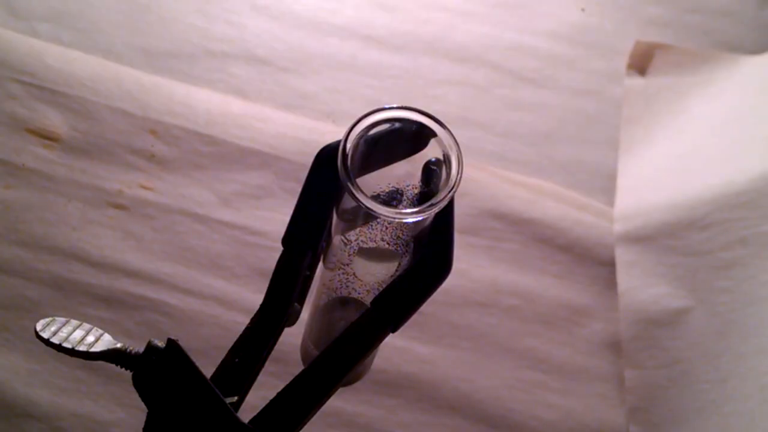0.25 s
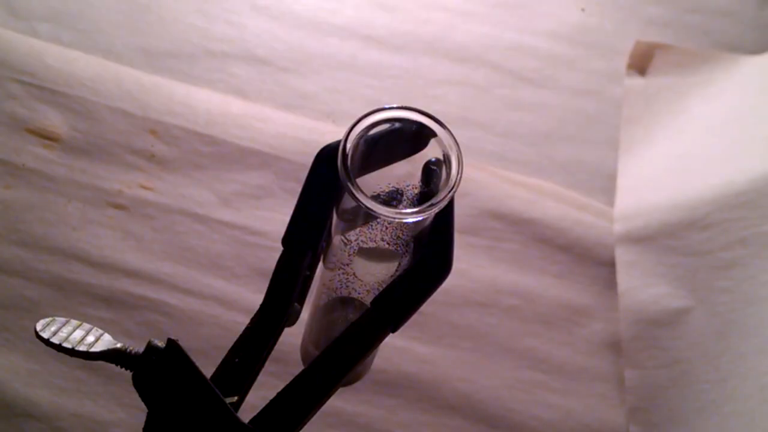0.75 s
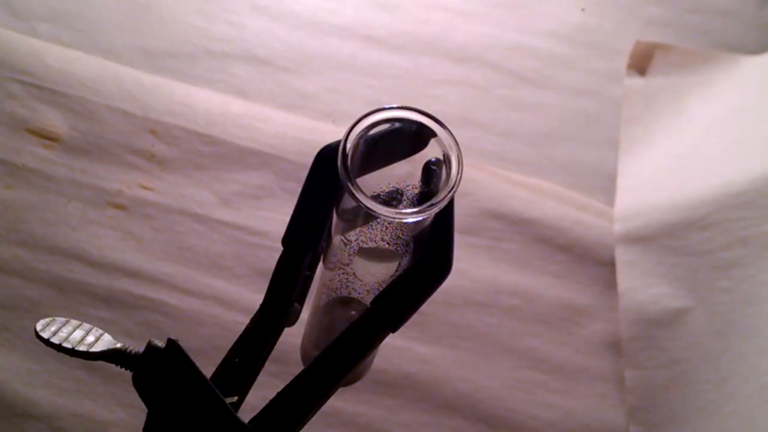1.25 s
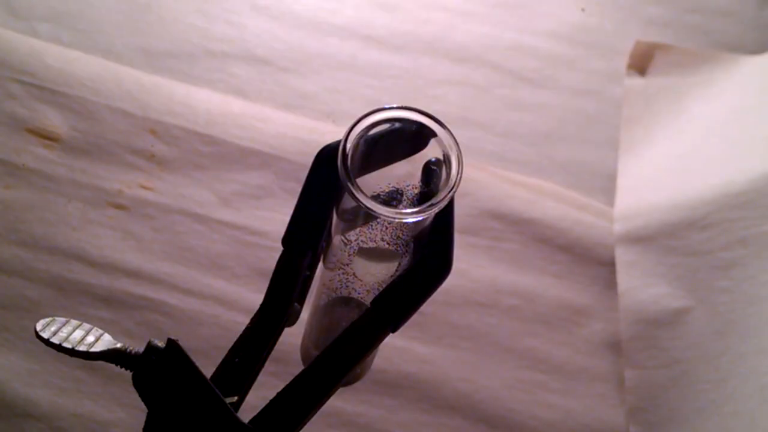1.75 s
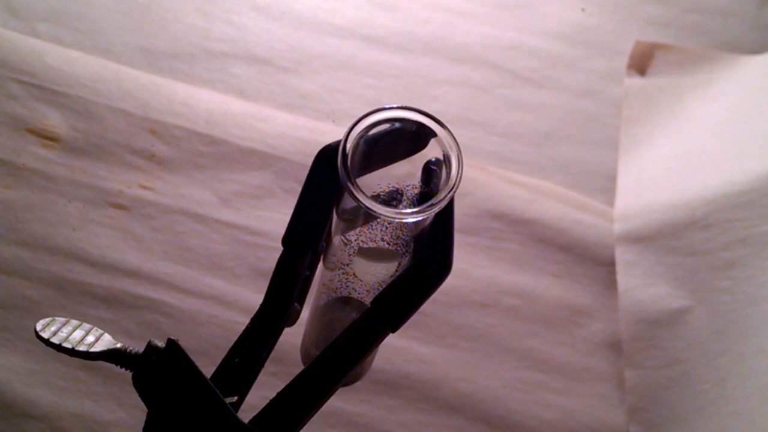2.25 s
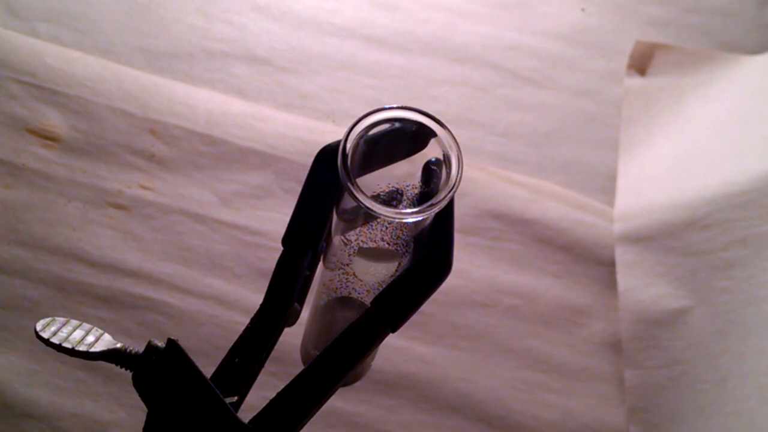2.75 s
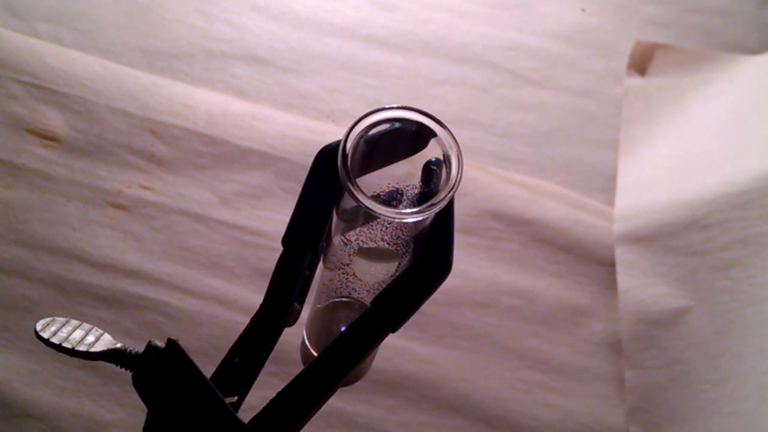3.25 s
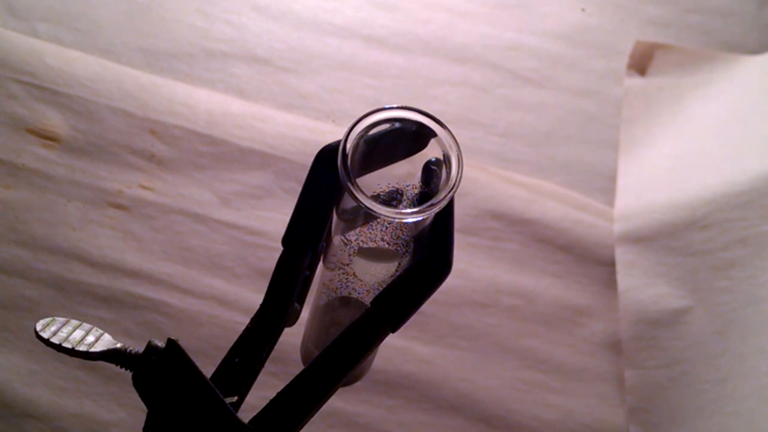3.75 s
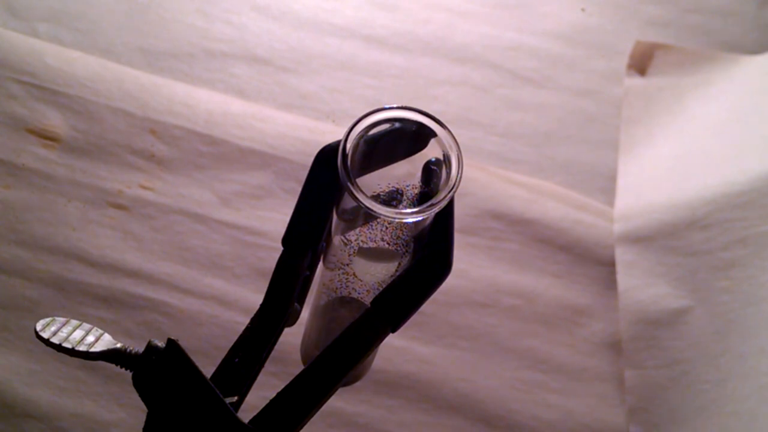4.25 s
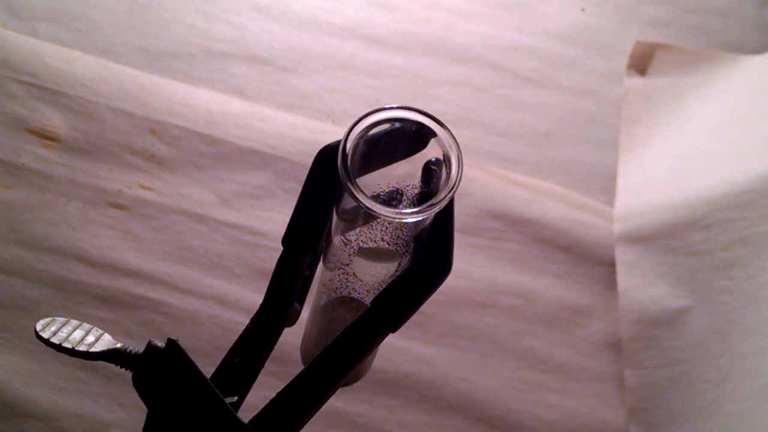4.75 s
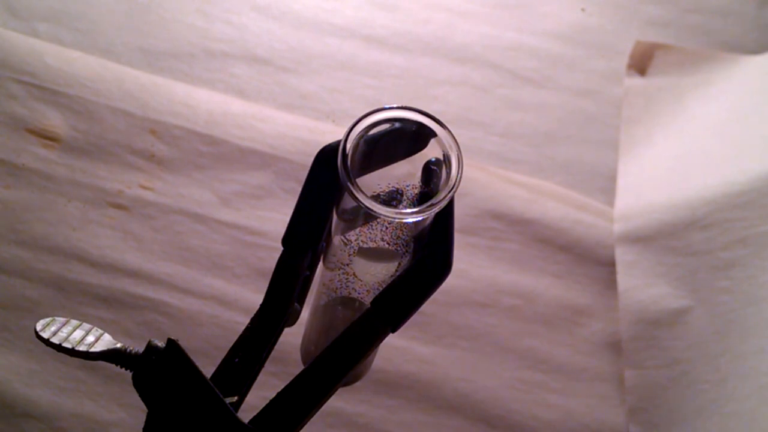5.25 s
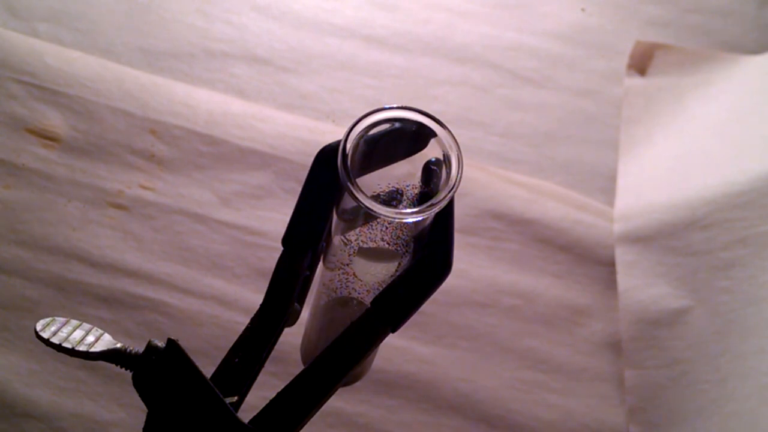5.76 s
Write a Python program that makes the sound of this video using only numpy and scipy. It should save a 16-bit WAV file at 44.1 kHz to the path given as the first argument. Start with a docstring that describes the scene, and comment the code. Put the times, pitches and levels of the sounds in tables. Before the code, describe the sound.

A chemical reaction ticks and pops inside a glass tube, glassy and hollow, growing louder and denser over a faint room hiss.

```python
"""In a small room, a reaction crackles close by in a clamped glass test tube.
Each flash in the liquid is a tiny blast that rings the air column (near odd multiples of about 650 Hz).
Sparks snap sharply between the pops, and gas bubbles sing short damped notes.
Fizz (noise grains), simmering (soft tube rings) and small flashes swell with the vigour of the reaction.
Low rumble, hiss and a fading mains hum lie underneath."""
import sys
import numpy as np
from scipy import signal
from scipy.fft import rfft, irfft
from scipy.io import wavfile
from scipy.ndimage import uniform_filter1d

SR = 44100
rng = np.random.default_rng(int(sys.argv[2]) if len(sys.argv) > 2 else 0)


def to_wav(sig):
    """Store sig (one row per channel, or 1-D mono) as 16-bit WAV at the path in sys.argv[1].

    Samples outside -1..1 are clipped; the rate is SR.
    """
    pcm = np.clip(np.atleast_2d(sig), -1, 1) * 32767
    pcm = np.round(pcm).astype(np.int16)
    wavfile.write(sys.argv[1], SR, pcm.T)  # frames by channels


N = 264600  # length in samples

# the bigger flashes that ring the tube: (t/s, push of gas/dB, sharpness/dB per register, crack/dB)
POPS = [(0.0602, -33, 4.5, -43), (0.0696, -26, -1.5, -50.0), (0.0856, -29, 4, -46), (0.1835, -38, 1.5, -45),
        (0.5416, -37.5, 5.5, -41), (0.5683, -36, -3, -41.5), (0.6104, -35, 1.5, -43),
        (0.6662, -33.0, -2, -39.5), (0.7436, -35.5, -2, -48), (0.9773, -34.5, 1.5, -39),
        (0.9874, -34.5, -2, -44.5), (0.996, -32, -3.5, -44.0), (1.105, -42.5, 1, -41),
        (1.2445, -34, -0.5, -53), (1.3253, -22, -0.5, -34), (1.4648, -36, 0, -49),
        (1.4924, -31.0, 1.5, -44.5), (1.854, -37.5, -5, -42.5), (2.204, -45.5, 1, -45.5),
        (2.3095, -42.5, 0.5, -46.0), (2.4414, -35, -0.5, -39.5), (2.612, -39.5, -0.5, -40),
        (2.769, -40.5, -1, -37), (2.8908, -33.5, -2, -46.0), (2.9655, -41, 3, -36),
        (3.1092, -38.5, -3, -43), (3.2173, -37, -1, -37), (3.29, -38.5, 1.5, -38.0),
        (3.3966, -22.5, -1.5, -47), (3.4156, -26, 2, -32.5), (3.533, -34, 10, -28.5),
        (3.6044, -27.5, 1, -61), (3.6163, -31.5, 0.5, -31.0), (3.7036, -38.5, 0, -31.5),
        (3.7742, -31.5, -2.5, -51), (3.8319, -31.5, 4.5, -36), (3.8646, -33.0, -8, -40),
        (3.9212, -17, 3, -17.5), (4.009, -22, 7.5, -23.5), (4.0972, -38.5, 0.5, -35.5),
        (4.1869, -36.5, -0.5, -42), (4.2728, -33.5, -2.5, -39.5), (4.307, -30, -3.5, -35.5),
        (4.3241, -27.5, -2.5, -44.5), (4.3355, -24.5, -4, -48.5), (4.375, -34, -1, -47),
        (4.4446, -37, 2.5, -39.5), (4.5963, -31, 0.5, -39), (4.6436, -33, 3, -54),
        (4.711, -15.5, 0.5, -29.5), (4.832, -32.0, 1.0, -37.5), (4.9504, -23.5, 6.5, -23),
        (4.9612, -22.5, 0.5, -24), (5.0298, -23.5, -3, -38.0), (5.0882, -34, -1, -38),
        (5.1509, -28.5, 2, -45), (5.1883, -31.5, -1.5, -47), (5.247, -37, 6.5, -43),
        (5.2942, -33.5, -2.5, -41), (5.351, -33.5, -3.5, -40), (5.4645, -33, 0, -38),
        (5.485, -26.5, -4, -39.5), (5.4944, -24.5, -2.5, -36), (5.5179, -27, -1.5, -41),
        (5.538, -31, -3.0, -48.0), (5.6985, -35.5, 4, -30.0), (5.8164, -31, 12, -20.5),
        (5.9188, -34.5, 5.0, -22), (5.9778, -30.5, 1.0, -34.5)]
# resonances of the tube and its foam: (f/Hz, time to fall by 60 dB/s, relative level/dB)
TUBE = [(540.4, 0.051, -16.5), (655.7, 0.058, 4), (1230, 0.041, -12), (1620, 0.048, -3.5), (1835, 0.024, 1),
        (1948.7, 0.057, 2.5), (3337, 0.024, 9.5), (3460, 0.011, -21), (4660, 0.03, -2.5),
        (6067, 0.017, 6.5), (7047, 0.025, 1), (8600, 0.028, -2.5), (12900, 0.0099, -25),
        (14300, 0.0061, -9)]
# how hard the reaction runs; drives the fizz, the simmering and the small flashes: (t/s, level/dB)
VIGOUR = [(0, -0.5), (1.75, 1.5), (2.3, -2), (2.8, 3), (3.8, 3.5), (4.8, 2.5), (5.4, 12), (6, 10.5)]
EDGE_HZ = 15750  # upper limit of the whole sound, and of the small sparks' centres


def gain_of(db):
    """Turns decibels into an amplitude factor."""
    return 10 ** (np.asarray(db) / 20)


def evened(x):
    """Scales a sound to an rms (average strength) of 1."""
    return x / np.sqrt(np.mean(x ** 2) + 1e-20)


def peaked(x, size):
    """Scales each row so that its loudest stretch of `size` samples has rms 1."""
    power = uniform_filter1d(x ** 2, size, axis=-1)
    return x / np.sqrt(power.max(-1, keepdims=True) + 1e-20)


def read_spectrum(points, hz):
    """Reads values between the points of a spectrum, along a log-frequency axis."""
    f, value = np.transpose(points)
    return np.interp(np.log(hz + 1), np.log(f), value)


def gain_over_time(curve):
    """Gives the gain at every sample from rows (t/s, level/dB)."""
    return gain_of(np.interp(np.arange(N) / SR, *np.transpose(curve)))


def coloured(x, points):
    """Makes each frequency louder or softer, following rows (f/Hz, gain/dB)."""
    hz = np.fft.rfftfreq(N, 1 / SR)
    return irfft(rfft(x) * gain_of(read_spectrum(points, hz)), N)


def band(x, low_hz, high_hz, order=2):
    """Keeps the frequencies between two limits (a causal band-pass filter)."""
    limits = [low_hz, min(high_hz, .45 * SR)]
    return signal.sosfilt(signal.butter(order, limits, "band", fs=SR, output="sos"), x)


def add(mix, s, sound):
    """Mixes a sound in from time s (seconds), cut off where the mix ends."""
    start = max(round(s * SR), 0)
    part = mix[:, start:][:, :sound.shape[-1]]
    part += sound[..., :part.shape[1]]


def sides(lean_db):
    """Gives left and right gains; a positive lean is to the right, a negative one to the left."""
    return gain_of(np.array([-lean_db, lean_db]) / 2)[:, None]


def background(air_db=-58.5, wide_db=7.0, hum_hz=124.83, hum_db=-62.5, hum_fade_db_per_s=2, hum_turn=2):
    """Low room rumble and hiss from shaped noise, plus a mains appliance whose faint hum fades."""
    # colour of the rumble and hiss: (f/Hz, relative level/dB)
    air_colour = [(15, -12), (38, -1), (55, -10.5), (120, -13.5), (250, -14), (500, -14.5), (1000, -21),
                  (2600, -29), (6000, -26), (15000, -25.5)]
    mid, side = (evened(coloured(noise, air_colour)) for noise in rng.standard_normal((2, N)))
    # the lows differ more between left and right than they agree
    side = coloured(side, [(130, wide_db), (300, 0.41)])
    air = gain_of(air_db) * np.array([mid + side, mid - side])
    t = np.arange(N) / SR
    phase = 2 * np.pi * hum_hz * t
    hum = evened(np.sin([phase, phase + hum_turn]))  # the right side is turned by 2 radians
    return air + gain_of(hum_db - hum_fade_db_per_s * t) * hum


def room(x, beam_hz=1100):
    """Low notes spread from the mouth of the tube and echo nearby; all bands feed a short tail."""
    # echoes off the bench and backdrop: (left delay/s, left gain, right delay/s, right gain)
    echoes = [(.00454, 0.33, .00644, 0.69), (.01156, 0.187, 0.01, 0.75), (.02041, 0.19, 0.025, 0.81),
              (.02649, 0.33, .02645, 0.35), (.03556, 0.53, 0.046, 0.42)]
    # how fast the tail dies away: (f/Hz, time to fall by 60 dB/s)
    tail_t60 = [(300, 0.3717), (700, 0.4), (2000, 0.14), (4000, 0.42), (8000, 0.2649), (15000, 0.2)]
    # how strong the tail is: (f/Hz, level/dB)
    tail_db = [(200, -19.5), (650, -3.5), (2000, -4), (3500, -9), (4800, -8.5), (7000, -7), (15000, -8.5)]
    low_pass = signal.butter(2, beam_hz, fs=SR, output="sos")
    low, out = signal.sosfiltfilt(low_pass, x.mean(0)), x.copy()
    for left_s, left, right_s, right in echoes:
        add(out[:1], left_s, left * low)
        add(out[1:], right_s, right * low)
    # the tail is noise that fades at its own pace in each band, after a silent start of 4 ms
    taps = rng.standard_normal((2, SR // 2))
    taps[:, :round(.004 * SR)] = 0
    hz, t, z = signal.stft(taps, SR, nperseg=256)
    t60 = read_spectrum(tail_t60, hz)[:, None]
    fall = gain_of(read_spectrum(tail_db, hz)[:, None] - 60 * t / t60)
    # long and short decays are set to equal energy before their levels apply
    shape = fall * np.sqrt(2 * np.log(1000) / (t60 * SR))
    tail = signal.istft(z * shape, SR, nperseg=256)[1]
    return out + signal.fftconvolve(x, tail, axes=1)[:, :N]


def tube_ring(t, tilt=0.2):
    """The tube's answer to one soft puff: fading sines; a larger tilt softens the high ones more."""
    return sum(gain_of(db - 60 * t / t60) * hz ** -tilt * np.sin(2 * np.pi * hz * t)
               for hz, t60, db in TUBE)


def clicks(per_s, spread_db, most=4, count=2000):
    """Single-sample impulses at random moments, many small and a few large, of either sign."""
    place, chance, sign = rng.random((count, 3))[:round(per_s * N / SR)].T
    size = gain_of(spread_db * np.minimum(-np.log(1 - chance), most))
    return np.bincount((place * N).astype(int), np.sign(sign - .5) * size, N)


def simmer(per_s=60, spread_db=3.5, tilt=1.5, calm_db=-64, follow=1.46):
    """Small bubbles burst all the time and ring the tube softly."""
    ring = tube_ring(np.arange(3000) / SR, tilt)
    rings = signal.oaconvolve(clicks(per_s, spread_db), ring)[:N]
    murmur = band(rings, 447.0, 8200)
    # each dB of vigour adds `follow` dB
    return gain_of(calm_db) * gain_over_time(VIGOUR) ** follow * evened(murmur)


def flare(flare_db=-21, lead=0.01, fade=0.012, follow=0.57):
    """The fizz flares up just before each bigger pop and dies away after it, more so for a hard crack."""
    t, out = np.arange(4000) / SR, np.zeros((1, N))
    swell = np.minimum(t / lead, 1) * np.exp(-t / fade)  # lead and fade in seconds
    for s, *_, crack_db in POPS:
        add(out, s - lead, gain_of(flare_db + follow * crack_db) * swell)
    return out[0]


def fizz(per_s=34, spread_db=4.0, t60=0.022, wander_db=4, clump_db=4.5, clump_hz=35, count=28, calm_db=-53.5):
    """Countless tiny sparks in irregular clumps, each kind a short grain with its own colour and side."""
    # colour of the fizz: (f/Hz, gain/dB)
    fizz_colour = [(900, -10), (1900, 4), (2600, -34.5), (3400, 8.5), (5000, -23), (6100, -2.5), (7400, -4),
                   (10200, -2.5), (11900, 3), (12800, -2), (14200, 5), (16000, 3.5)]
    t, out = np.arange(500) / SR, np.zeros((2, N))
    for _ in range(count):
        grain = rng.standard_normal(len(t)) * gain_of(-60 * t / t60)
        hz = rng.uniform(4350, 15820)
        grain = .5 * evened(grain) + evened(band(grain, hz / 1.336, hz * 1.13))
        sparks = signal.oaconvolve(clicks(per_s, spread_db), grain)[:N]
        out += sparks * sides(wander_db * rng.standard_normal())
    # slow noise makes the sparks bunch together
    clumps = gain_of(clump_db * evened(band(rng.standard_normal(N), 2.1, clump_hz)))
    strength = np.hypot(gain_of(calm_db) * gain_over_time(VIGOUR), flare())
    return strength * evened(clumps * coloured(out, fizz_colour))


def bubbles(t60=0.046, rise_cycles=0.78):
    """Gas bubbles sing short damped notes that swell over about their first cycle."""
    # one note per bubble: (t/s, f/Hz, level/dB)
    bubble_notes = [(0.001, 1545, -38.5), (0.986, 1635, -29.5), (0.997, 1930, -33.5), (1.3257, 1275, -29),
                    (3.6063, 1470, -31), (4.712, 1930, -14.5), (4.714, 1490, -26.5), (4.952, 1580, -23),
                    (4.962, 1906, -25.5), (4.966, 534, -26.5), (5.0301, 1963, -18.5), (5.221, 3400, -36.5),
                    (5.496, 1424, -34)]
    t, out = np.arange(3000) / SR, np.zeros((2, N))
    for s, hz, db in bubble_notes:
        swell = 1 - np.exp(-(hz * t / rise_cycles) ** 2)
        note = np.sin(2 * np.pi * hz * t) * gain_of(-60 * t / t60) * swell
        add(out, s, gain_of(db) * peaked(note, size=80))
    return out


def by_chance(per_s, most=200):
    """Random moments, each with the vigour of the reaction then (dB) and three random traits."""
    draws = rng.standard_normal((most, 5))
    # the mean of two squared normal draws gives the waiting times of purely random events
    times = np.cumsum((draws[:, :2] ** 2).mean(1)) / per_s
    vigour = np.interp(times, *np.transpose(VIGOUR))
    rows = np.column_stack([times, vigour, draws[:, 2:]])
    return rows[times < N / SR]


def small_snaps(per_s=3.9, calm_db=-45, vary_db=9.0, follow=0.46, centre_hz=12500, octaves=0.24):
    """Weak sparks of varied colour, as rows (t/s, level/dB, centre f/Hz); they grow with the reaction."""
    return [(s, calm_db + follow * vigour + vary_db * a, min(centre_hz * 2 ** (octaves * b), EDGE_HZ))
            for s, vigour, a, b, _ in by_chance(per_s)]


def snaps(t60=0.0075, sputter_db=-12.5, sputter_t60=0.05, spread=1.1038, broad_db=-4, lean_db=2,
          wander_db=3, knock_db=-22):
    """Millisecond cracks that sputter out, each with a bright centre and a faint knock in the tube."""
    # sparks that snap with hardly any ring of the tube: (t/s, level/dB, centre f/Hz)
    big_snaps = [(0.1607, -32, 8450), (0.279, -24.5, 8950), (0.2565, -38, 9400), (0.4947, -32.5, 12160),
                 (0.8996, -35, 11560), (0.9718, -35, 13590), (1.7976, -33.5, 13510), (1.8704, -30, 14300),
                 (2.7861, -34, 10890), (2.8488, -30.5, 15020), (3.1604, -30, 13740), (3.535, -18.5, 6200),
                 (3.9167, -19, 6150), (4.5016, -31, 14350), (4.8715, -28.5, 14500), (4.9518, -19, 8342),
                 (5.1229, -28.5, 8100), (5.3425, -23.5, 12100), (5.3824, -25, 13300), (5.6164, -21, 12600),
                 (5.6346, -24, 12060), (5.7142, -13.5, 6880), (5.8144, -23.5, 13360)]
    t, out = np.arange(1800) / SR, np.zeros((2, N))
    knock = peaked(tube_ring(t), size=44)
    # a quick fall with a weaker, slower one beneath it
    fall = gain_of(-60 * t / t60) + gain_of(sputter_db - 60 * t / sputter_t60)
    for s, db, hz in big_snaps + small_snaps():
        centre, broad = rng.standard_normal((2, len(t))) * fall
        centre = peaked(band(centre, hz / spread, hz * spread), size=44)
        broad = peaked(band(broad, 7300, 18300), size=44)
        crack = peaked(centre + gain_of(broad_db) * broad, size=44)
        side_gains = sides(lean_db + wander_db * rng.standard_normal())
        add(out, s, gain_of(db) * (crack + gain_of(knock_db) * knock) * side_gains)
    return out


def small_pops(per_s=4, push_db=-53, crack_db=-53, vary_db=-0.5, follow=1.23):
    """Weak flashes between the big ones, in rows like POPS; they grow with the reaction."""
    return [(s, push_db + follow * vigour + vary_db * a, vary_db * b, crack_db + follow * vigour + vary_db * c)
            for s, vigour, a, b, c in by_chance(per_s)]


def register_levels(push, sharpness, crack):
    """Pop level per register: a sharper burst favours higher resonances; the crack is the top register."""
    # an ordinary pop's lowest three registers: (level against its push/dB)
    register_db = (0, -8, -8.5)
    return [push + db + step * sharpness for step, db in enumerate(register_db)] + [crack]


def ragged(sound, late_db, early_s, early_db=-18, late_s=0.0088):
    """A flash catches in steps: weak start, main burst, straggler. The main burst is delayed by early_s."""
    out = np.zeros(sound.shape)
    for row, one, (first, last) in zip(out, sound, rng.uniform(.25, 1, (len(sound), 2))):
        add(row[None], early_s * (1 - first), gain_of(early_db) * one)
        add(row[None], early_s, one)
        add(row[None], early_s + late_s * last, gain_of(late_db) * one)
    return out


def pops(scatter_db=5.0, detune=0.011, lean_db=(-3, -.7, 3, 1.5), wander_db=1.5, build_up=2, apart=0.29,
         early_s=0.0055, straggler_db=(-28, -14, -10, -8)):
    """A burst of gas, then the tube's ringing; each flash sits elsewhere and weights the modes anew."""
    # gas burst in each of four registers: (low f/Hz, high f/Hz, time to fall by 60 dB/s, level against ringing/dB)
    gas_bursts = [(507, 676, 0.014, -16.5), (1421, 2085, 0.023, -3.5), (3040, 4760, 0.012, -4),
                  (5070, 19000, 0.013, 2)]
    t, out = np.arange(3000) / SR, np.zeros((2, N))
    times, *traits = np.transpose(list(POPS) + small_pops())
    levels, lean = register_levels(*traits), rng.standard_normal(len(times))
    for k, (low, high, blast_t60, blast_db) in enumerate(gas_bursts):
        ring = np.zeros((len(times), len(t)))
        for hz, t60, db in TUBE:
            if low < hz < high:
                weight, pitch = rng.standard_normal((len(times), 2)).T[:, :, None]
                # pitch varies more in the higher registers
                turns = hz * (1 + detune * (1 + k / 2) * pitch) * t
                fall = gain_of(-60 * t / t60)
                ring += gain_of(db + scatter_db * weight) * fall * np.sin(2 * np.pi * turns)
        # the ringing swells over its first cycles
        swell = 1 - np.exp(-2 * np.pi * low * t / build_up)
        ring = band(ring * swell, low, high, order=1)
        # one burst joins the ringing; a second makes the two sides differ
        noise = rng.standard_normal((2, *ring.shape)) * gain_of(-60 * t / blast_t60)
        burst = band(noise, low, high, order=4)
        blast, side_blast = gain_of(blast_db) * peaked(burst, size=80)
        sound = ragged(peaked(ring, size=80) + blast, late_db=straggler_db[k], early_s=early_s)
        sound = peaked(sound, size=80)
        for s, db, one, other, side in zip(times, levels[k], sound, side_blast, lean):
            gain = gain_of(db) * sides(lean_db[k] + wander_db * side * k / 2)
            add(out, s - early_s, gain * one)
            # the blast reaches the two microphones a little differently
            add(out, s, apart * gain * np.array([other, -other]))
    return out


def scene(lag_samples=0.36):
    """The reaction in its room; its sound reaches the right microphone a hair later."""
    left, right = pops() + snaps() + bubbles() + simmer() + fizz()
    # turning the phase in step with frequency delays by a fraction of a sample
    delay = np.exp(-2j * np.pi * np.fft.rfftfreq(N) * lag_samples)
    right = irfft(rfft(right) * delay, N)
    return room(np.array([left, right])) + background()


def record(dry):
    """The recorder's band limit: a low-pass filter removes the highest treble."""
    low_pass = signal.firwin(255, EDGE_HZ, window=("kaiser", 8), fs=SR)
    return signal.oaconvolve(dry, low_pass[None], "same", axes=1)


dry = scene()
out = record(dry)
to_wav(out)
```